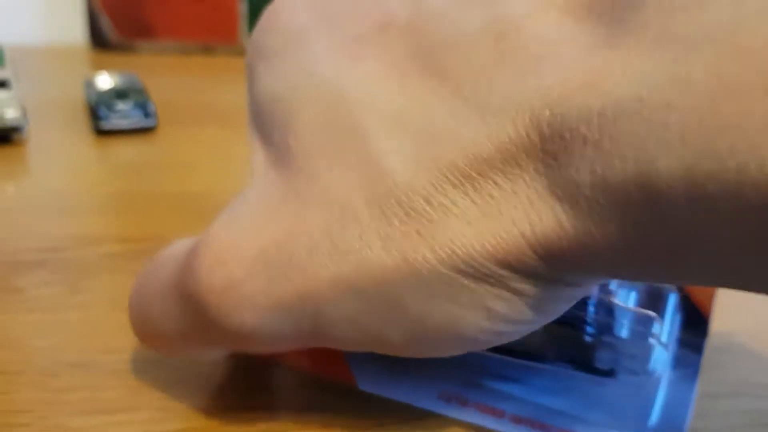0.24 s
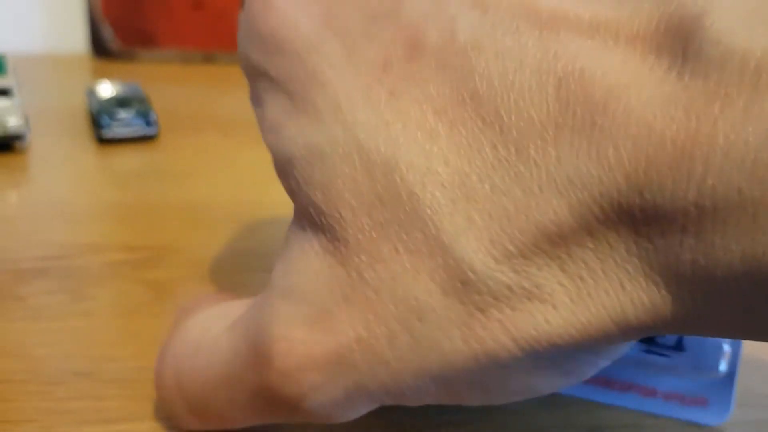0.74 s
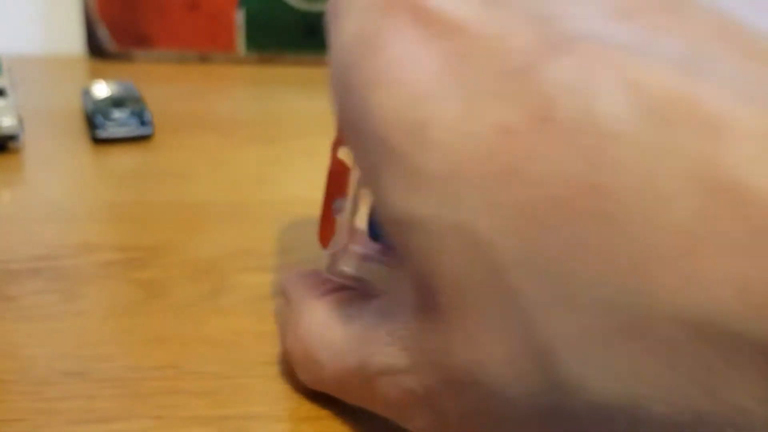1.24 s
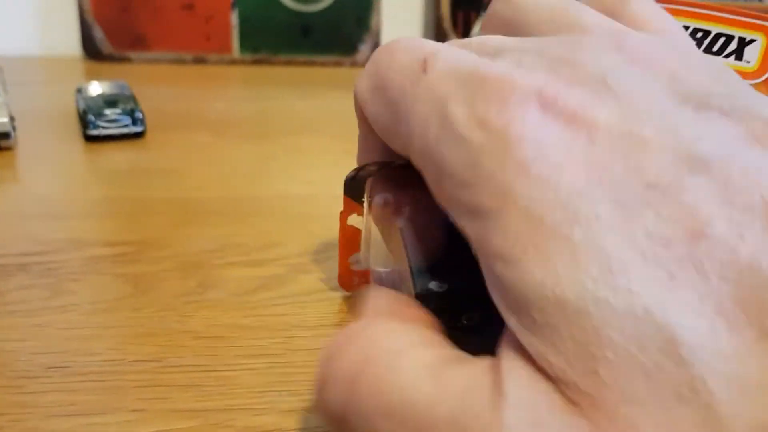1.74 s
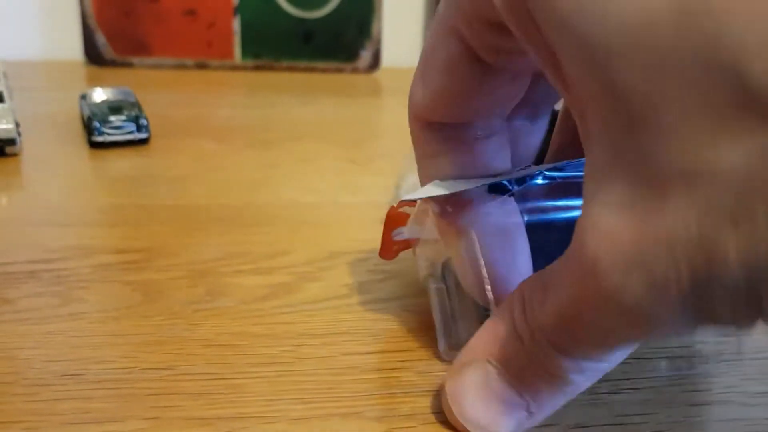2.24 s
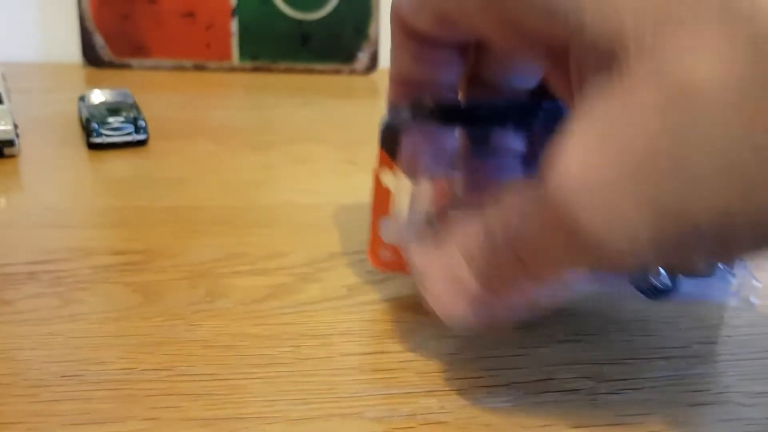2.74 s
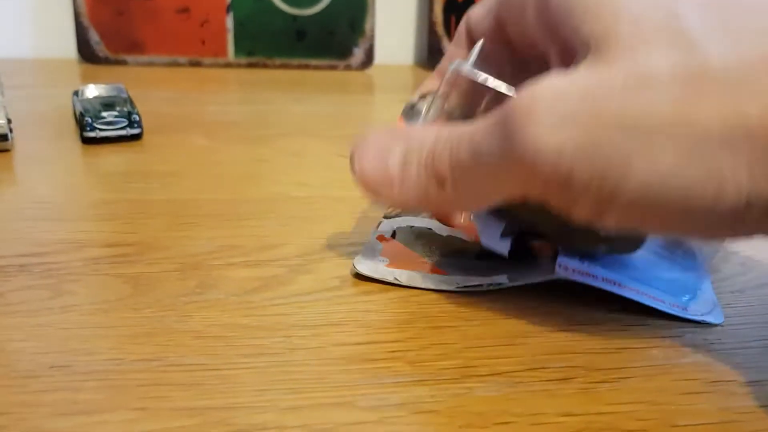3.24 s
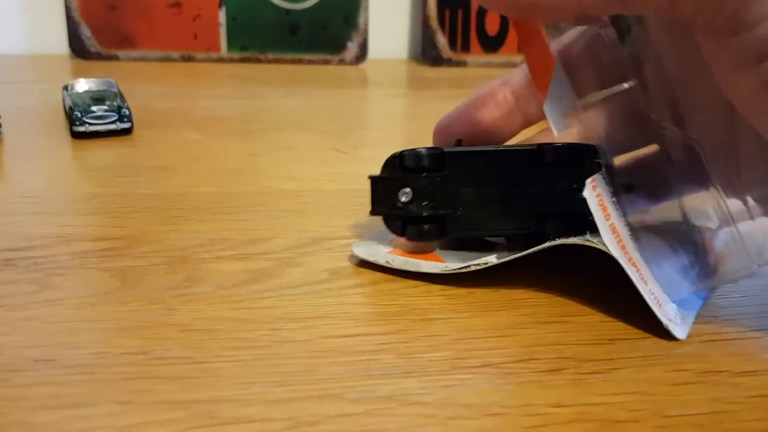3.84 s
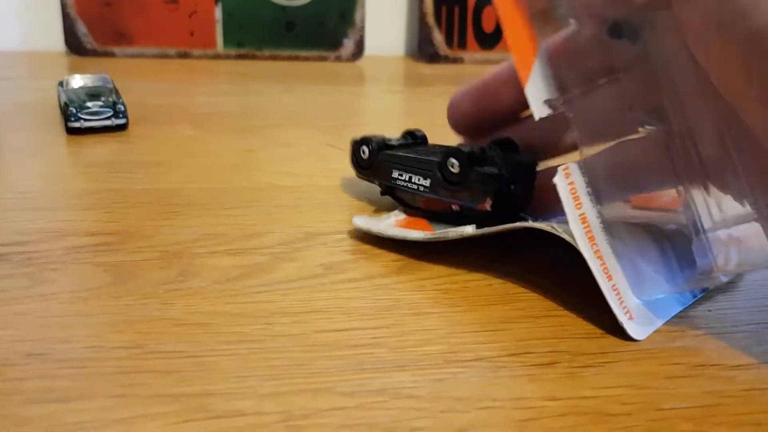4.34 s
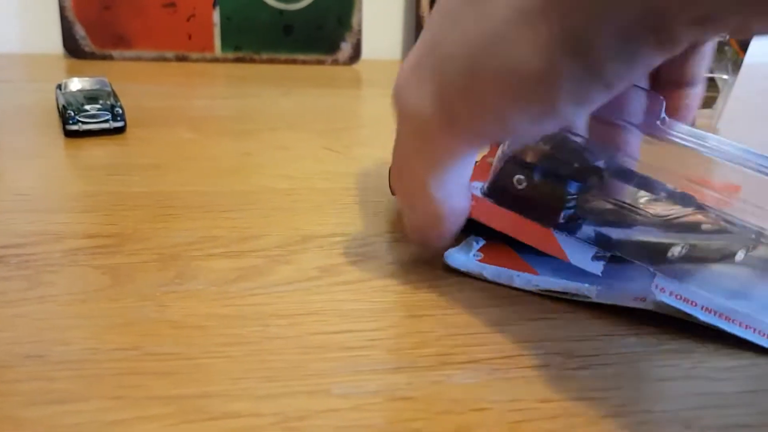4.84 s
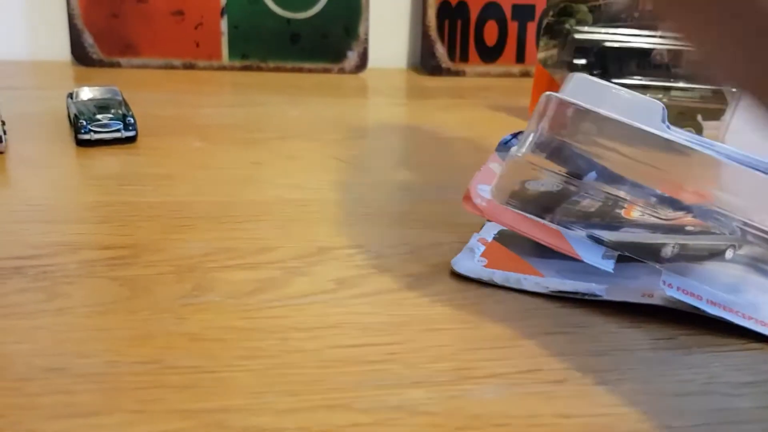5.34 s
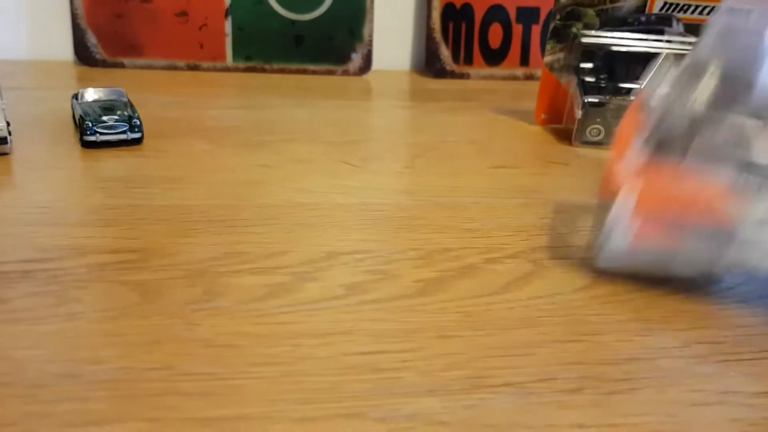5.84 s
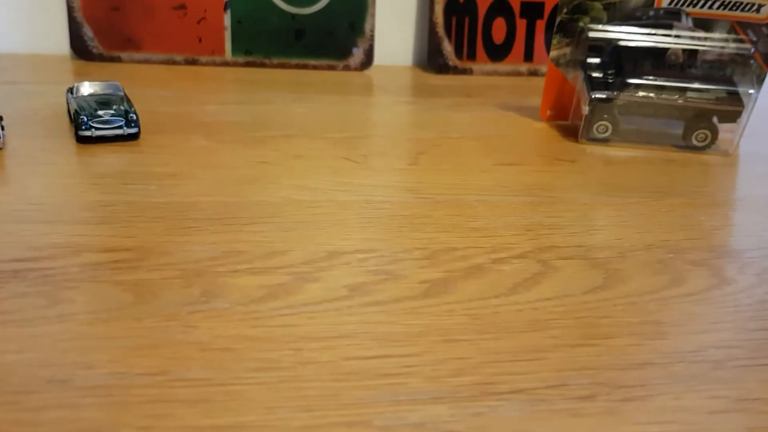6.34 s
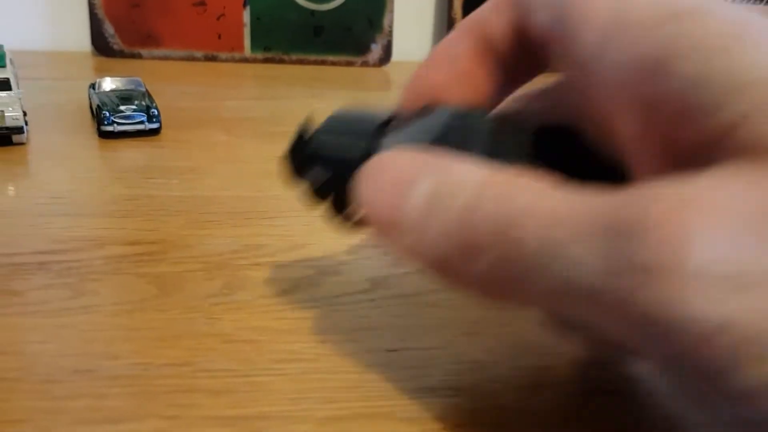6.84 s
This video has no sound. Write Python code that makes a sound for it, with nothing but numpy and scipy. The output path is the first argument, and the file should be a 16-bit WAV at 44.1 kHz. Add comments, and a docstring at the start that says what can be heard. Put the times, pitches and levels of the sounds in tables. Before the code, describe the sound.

In a small, lightly echoing room, a phone close to a wooden table picks up a plastic squeak and soft rustle at once. At about 0.35-0.5 s the clear shell buckles in loud, bright snaps with a short dense rip of glued cardboard; another hard snap and rip comes at 1.0 s. From 1.2 to 3.1 s there is quieter crinkling, fibre crackle, scattered pops and tiny squeaks, with stronger snaps near 1.7, 2.5 and 2.86 s. Around 3.2-3.4 s squeaks and tearing lead to a solid toy-car thud with rattle. Light tearing and a snap at 3.8 s follow, then rattling knocks at 4.25-4.55 s and a snap at 4.94 s. Faint plastic sliding comes near 5.4 s. The hollow empty pack clatters further off at 5.65 s and again at 6.25-6.45 s, then near quiet over low hum, with barely audible scuffs.

```python
"""A squeak and a soft rustle come first: a clear plastic blister is being peeled off its backing card.
The shell snaps as its panels buckle and ring, and the glued seam crackles and rips as fibres break.
Bursts of ringing modes make a toy car knock on card and table, with a rattle from its wheels and base.
The empty pack clatters down further off, with more room echo, and ticking friction makes it slide.
Decaying noise makes the small room's echoes; a quiet low noise is its hum, all heard through a phone."""
import sys
import numpy as np
from scipy import signal
from scipy.fft import rfft, irfft, next_fast_len
from scipy.io import wavfile
from scipy.ndimage import uniform_filter1d

SR = 44100
rng = np.random.default_rng(int(sys.argv[2]) if len(sys.argv) > 2 else 0)


def inscribe(sig):
    """Save sig as 16-bit PCM at rate SR to the path in sys.argv[1].

    A 1-D sig is mono; a 2-D sig holds one channel per row.
    Samples are clipped to [-1, 1] before scaling.
    """
    pcm = np.round(np.clip(np.atleast_2d(sig).T, -1, 1) * 32767)
    wavfile.write(sys.argv[1], SR, pcm.astype(np.int16))


N = 312624
T = np.arange(N) / SR  # time [s]
HIT = T[:SR // 4]  # time within one short hit [s]
LEAD_S = 0.005  # a hit starts this long before its sharp push [s]
TOP_HZ = 16300  # highest pitch the phone passes [Hz]


def amp(db):
    """Turn decibels into a gain."""
    return 10 ** (np.asarray(db) / 20)


def unit(x):
    """Scale so that the channels have a total energy of 1 each on average."""
    return x / np.sqrt(np.mean(np.sum(x ** 2, axis=-1)))


def sized(x, db):
    """Give a hit the same energy as 10 ms of sound at this level."""
    return unit(x) * amp(db) * np.sqrt(SR / 100)


def at(points, hz):
    """Read a table of points on a log-frequency axis."""
    f, value = np.transpose(points)
    return np.interp(np.log(np.maximum(hz, 1)), np.log(f), value)


def through(x, response):
    """Let each channel set off a response (convolution), keeping the length."""
    return signal.fftconvolve(np.atleast_2d(x), np.atleast_2d(response), axes=-1)[:, :x.shape[-1]]


def colour(x, points, size=2048):
    """Shape the spectrum with a minimum-phase filter of unit energy, which never rings ahead of a hit."""
    levels_db = at(points, np.fft.rfftfreq(size, 1 / SR))
    cepstrum = irfft(np.log(amp(levels_db)))
    # fold the cepstrum so that the filter only looks back in time
    cepstrum[1:size // 2] *= 2
    cepstrum[size // 2 + 1:] = 0
    return through(x, unit(irfft(np.exp(rfft(cepstrum)))))


def pair(count, apart):
    """Noise at two microphones; apart is the weight of what they do not share."""
    common, left, right = rng.standard_normal((3, count))
    return (common + apart * np.array([left, right])) / np.hypot(1, apart)


def panned(x, pan_db):
    """Make left louder than right by pan_db, keeping the average power."""
    gains = amp(np.array([[pan_db], [-pan_db]]) / 2)
    return x * gains / np.sqrt(np.mean(gains ** 2))


def add(out, s, x):
    """Mix a sound in at time s."""
    i = max(int(s * SR), 0)
    out[:, i:i + x.shape[-1]] += x[:, :N - i]


def ring(hz, t60):
    """One decaying mode: a tone that falls by 60 dB in t60 seconds."""
    return np.sin(2 * np.pi * hz * HIT) * np.exp(-np.log(1000) * HIT / t60)


def contact(fade_s, scatter, apart, creep=0.15, grain_db=0):
    """A brief creep, one sharp push at LEAD_S, then a dying scatter of slips that come in 1 ms clumps."""
    t = HIT - LEAD_S
    clump_sizes = amp(grain_db * np.clip(rng.standard_normal(len(HIT)), -2, 2))
    clumps = clump_sizes[(HIT * 1000).astype(int)]
    before = creep * np.exp(-np.abs(t) / 0.002)
    after = np.exp(-np.abs(t) / fade_s)
    slips = np.where(t < 0, before, after)
    push = scatter * unit(pair(len(HIT), apart) * slips * clumps)
    push[:, int(LEAD_S * SR)] += 1
    return push


def crackle(rate, spread_db, apart):
    """Fibres breaking at random, rate per second: many faint, a few strong; rms 1."""
    strength = np.minimum(rng.exponential(size=N), 4)
    breaks = rng.random(N) < rate / SR
    sizes = amp(spread_db * strength) * breaks
    return unit(sizes * np.clip(pair(N, apart), -2, 2)) * np.sqrt(N)


def flutter(rate, depth_db):
    """Uneven grip: a gain that wanders to a new random value rate times a second."""
    k = int(SR / rate)
    steps = np.repeat(rng.standard_normal(N // k + 1), k)
    return amp(depth_db * uniform_filter1d(steps, k)[:N])


def flexing(x, depth_db, width_hz, hold_s, size=512):
    """As the sheet bends its resonances come and go, so every crinkle has its own colour."""
    _, _, frames = signal.stft(x, nperseg=size)
    field = rng.standard_normal(frames.shape[1:])
    # blur the random gains over pitch, then over time
    for axis, span in enumerate([width_hz * size / SR, hold_s * SR / (size / 2)]):
        blur = np.exp(-(np.arange(-20, 21) / span) ** 2)
        field = signal.fftconvolve(field, np.expand_dims(blur, 1 - axis), "same")
    gain = amp(depth_db * np.clip(field / field.std(), -2, 2))
    gain = gain / np.sqrt(np.mean(gain ** 2))
    return signal.istft(frames * gain, nperseg=size)[1][:, :N]


# The shell buckles: (time [s], level [dB], panel pitch [Hz], crack relative to level [dB])
BUCKLES = [(0.242, -40, 780, -3.5), (0.361, -19, 1120, 2.5), (0.3853, -24.5, 1280, 3.5),
           (0.4945, -22.5, 1030, -23), (0.6429, -40.5, 730, -12), (0.719, -46.5, 1130, -7),
           (0.8257, -39, 814, -14.5), (0.9939, -14.5, 1010, -14.5), (1.021, -25, 1120, -4.5),
           (1.1011, -29.5, 1130, -7), (1.112, -36, 1330, -11), (1.6855, -30, 1074, -8.5),
           (1.739, -43.5, 1060, 0.5), (1.853, -43.5, 1170, -10), (1.9129, -42.5, 870, -4),
           (1.9399, -38, 1130, -4.5), (2.1855, -35.5, 1190, -8.5), (2.4257, -41.5, 1140, -21),
           (2.5017, -29.5, 1135, -13), (2.5717, -28, 1080, -16.5), (2.6247, -41.5, 1170, -14),
           (2.8632, -23.5, 1314, -0.5), (3.023, -40.5, 1260, -23), (3.077, -33.5, 880, -7.5),
           (3.2997, -42, 1110, 8), (3.7692, -44, 1300, 8), (3.8126, -24, 970, -8),
           (4.226, -50.5, 1140, 3.5), (4.7971, -43, 1200, 3.5), (4.9401, -29, 1247, -4.5)]
# Ringing of the backing card: (frequency [Hz], level [dB], 60 dB decay time [s])
CARD_RINGING = [(208, -5, 0.0073), (278, 0.5, 0.068), (503, 9, 0.013)]
# Soft buckles lean on the card, hard ones spring free: (level [dB], thump relative to level [dB])
CARD_THUMP = [(-40, -12.5), (-18.5, -18.5)]
# The pack moves from the left to the middle: (time [s], left minus right [dB])
PACK_PLACE = [(0.4, 5), (1.7, 4), (3.0, 3), (3.8, 1.9), (4.9, -1)]
# Tone of the ringing shell: (frequency [Hz], level per Hz [dB])
SHELL_TONE = [(150, -25), (400, -8.5), (700, -3), (1100, 6.5), (1850, 4), (2300, 1), (3200, -17),
              (6000, -38)]
# How card and table give off sound: (frequency [Hz], level per Hz [dB])
BOARD_TONE = [(40, -31.5), (100, -13.5), (180, 0), (700, 2.5), (1300, -9), (4000, -32.5)]
# Tone of a bright crack: (frequency [Hz], level per Hz [dB])
CRACK_TONE = [(1200, -44.5), (2300, -1), (3000, 0.5), (3700, 1.5), (4300, 1), (4900, 2), (5700, -21.5),
              (9000, -30)]
# Tone of the fizz, higher still: (frequency [Hz], level per Hz [dB])
FIZZ_TONE = [(3500, -24), (5400, -6), (7200, 3), (8800, -4.5), (11000, 3), (13000, -2.5), (16000, -7)]
WALL_HZ, WALL_SPREAD = 1609, 0.11  # shell wall pitch [Hz], its spread as the grip changes [share]
FIZZ_DB, FIZZ_PAN_DB = -8, 3.5  # fizz relative to crack [dB], fizz left minus right [dB]
TREBLE_SHADE = 1.7  # the crack is shaded more on its way to the far microphone [times the shell's pan]


def snaps():
    """Each buckle rings its panel and the hand-damped wall, thumps the card and sheds a bright crack."""
    out = np.zeros((2, N))
    card = sum(amp(mode_db) * ring(hz, t60) for hz, mode_db, t60 in CARD_RINGING)
    for s, db, panel_hz, crack_db in BUCKLES:
        wall_hz = WALL_HZ * (1 + WALL_SPREAD * rng.standard_normal())
        modes = ring(panel_hz, 0.015) + 1.2 * ring(0.66 * panel_hz, 0.014)
        modes += 1.1 * ring(wall_hz, 0.02) + 0.45 * ring(1.25 * wall_hz, 0.012)
        modes[0] += 12.0  # the broad flex of the whole wall
        creep = np.interp(db, [-38, -22], [0.6, 0.1])  # soft buckles ease in, hard ones go at once

        shell = colour(through(contact(0.014, 0.34, 0.15, creep), modes), SHELL_TONE)
        thump = colour(through(contact(0.0022, 1.0, 0.36), card), BOARD_TONE)
        crack = colour(contact(0.0035, 1.4, 1.0, creep), CRACK_TONE)
        fizz = colour(contact(0.0029, 1.3, 2.3), FIZZ_TONE)

        pan_db = np.interp(s, *np.transpose(PACK_PLACE))
        thump_db = db + np.interp(db, *np.transpose(CARD_THUMP))
        snap = sized(thump, thump_db) + panned(sized(shell, db), pan_db)
        snap += panned(sized(crack, db + crack_db), TREBLE_SHADE * pan_db)
        snap += panned(sized(fizz, db + crack_db + FIZZ_DB), FIZZ_PAN_DB)
        add(out, s - LEAD_S, snap)
    return out


# Hand tugs: (peak time [s], length [s], rustle level [dB], tearing fibres relative to rustle [dB])
HAND_TUGS = [(0.03, 0.12, -40.5, -3), (0.248, 0.083, -47, 2.5), (0.6, 0.078, -49, -2.5),
             (0.834, 0.11, -48, -3), (0.99, 0.025, -36, 2), (1.1, .09, -47.5, -7), (1.287, 0.3, -52.5, -9),
             (1.59, 0.044, -53, -10), (1.751, 0.061, -49, -2.5), (1.826, 0.052, -47.5, -9.5),
             (1.92, .022, -41.5, -7.5), (1.948, 0.082, -51.5, 0), (2.187, 0.025, -46.5, -9),
             (2.309, 0.029, -43, -11), (2.503, 0.046, -43.5, -5.5), (2.622, 0.073, -44, -5.5),
             (2.765, 0.077, -42, -5.5), (3.035, 0.27, -47, -8), (3.224, 0.087, -44, 1),
             (3.306, 0.021, -43.5, 6), (3.358, 0.19, -48, 11.5), (3.736, 0.19, -49, 5.5),
             (3.94, 0.15, -56.5, 3.5), (4.145, 0.089, -52, -2.5), (4.333, 0.24, -49.5, -0.5),
             (4.545, 0.12, -49.5, -3), (4.806, 0.024, -43.5, -4.5), (4.877, 0.095, -45.5, -1.5)]
# Faint rustle of the held pack between tugs: (time [s], level [dB])
HELD_RUSTLE = [(0, -56), (1.05, -57.5), (1.5, -66.5), (2.08, -56), (2.45, -62.5), (2.9, -57.5),
               (3.6, -55.5), (4.5, -64), (4.7, -73.5), (4.98, -57), (5.12, -92.5)]
# Tone of the rustling shell: (frequency [Hz], level per Hz [dB])
RUSTLE_TONE = [(80, -23), (220, -8.5), (420, -8), (700, -0.5), (900, -3.5), (1110, 5), (1350, -3.5),
               (1660, 4), (2100, -5), (2700, -13), (5000, -33.5)]
# Tone of the tearing fibres: (frequency [Hz], level per Hz [dB])
FIBRE_TONE = [(1200, -15), (2400, 0.5), (3400, -0.5), (4400, 2), (5600, -6.5), (7200, -5), (9000, -10),
              (11400, -3.5), (13000, -8), (16000, -16.5)]
GRIP_FIBRES_DB = -4.5  # fibres parting under the steady grip, relative to its rustle [dB]
TUG_RISE = 0.38  # share of a tug spent building up; the rest is its release


def peeling():
    """Grip and tugs set the shell rustling while card fibres part along the glue line."""
    shell_power = amp(np.interp(T, *np.transpose(HELD_RUSTLE))) ** 2
    fibre_power = shell_power * amp(GRIP_FIBRES_DB) ** 2
    for s, length_s, db, tearing_db in HAND_TUGS:
        power = tug(s, length_s) * amp(db) ** 2
        shell_power = shell_power + power
        fibre_power = fibre_power + power * amp(tearing_db) ** 2
    shell = colour(crackle(rate=1400, spread_db=1.5, apart=0.93), RUSTLE_TONE) * np.sqrt(shell_power)
    fibres = colour(crackle(rate=4100, spread_db=1, apart=8.2), FIBRE_TONE) * np.sqrt(fibre_power)
    pull = panned(shell, pan_db=2) + panned(fibres, pan_db=5.0)
    pull = pull * flutter(rate=120, depth_db=2.5) * amp(0.18)  # the small lift applies to all peeling
    return flexing(pull, depth_db=2.5, width_hz=250, hold_s=0.014)


def tug(s, length_s):
    """The power of one tug: a quick build-up to its peak at s, then a slower release."""
    side_s = length_s * np.where(T < s, TUG_RISE, 1 - TUG_RISE)
    progress = (T - s) / side_s
    return np.exp(-2 * np.minimum(progress ** 2, 20))


# A stretch of seam lets go at once: (time [s], level [dB], time to fade to 1/e [s])
SEAM_RIPS = [(0.368, -15.5, .032), (0.998, -26, .03), (3.401, -35, 0.029)]
# Tone of the ripping seam: (frequency [Hz], level per Hz [dB])
SEAM_TONE = [(150, -24), (400, -15.5), (700, -3.5), (1200, -4.5), (2000, 5), (2800, -5.5), (4200, -3.5),
             (5600, -14.5), (8500, -19.5), (11500, -17), (16000, -29)]


def rips():
    """A run of the seam gives way in a dense, fading burst."""
    force = np.zeros((1, N))
    for s, db, fade_s in SEAM_RIPS:
        add(force, s, amp(db) * np.exp(-HIT[None] / fade_s))
    breaks = crackle(rate=5400, spread_db=1, apart=3.1)
    return panned(colour(breaks * force, SEAM_TONE), pan_db=3)


# A single strand of the card pops: (time [s], level [dB])
STRAND_POPS = [(0.1055, -46.5), (0.117, -49), (0.2112, -44.5), (0.2323, -35.5), (3.1935, -41), (3.335, -37),
               (3.4666, -40.5), (3.652, -51.5), (3.7288, -46), (3.893, -54), (3.911, -46), (4.045, -53)]


def pops():
    """A breaking strand is all treble: too light to ring the shell."""
    out = np.zeros((2, N))
    for s, db in STRAND_POPS:
        push = contact(0.003, 3, 1.2)
        pop = sized(colour(push, FIZZ_TONE), db) + sized(colour(push, CRACK_TONE), db - 7)
        add(out, s - LEAD_S, panned(pop, pan_db=10.5))
    return out


# Plastic sticks and slips: (centre time [s], half length [s], central pitch [Hz], level [dB])
PLASTIC_SQUEAKS = [(0.035, 0.015, 1720, -34.5), (0.08, 0.0063, 1750, -33), (1.765, 0.023, 3540, -46.5),
                   (1.971, 0.0043, 1020, -32.5), (2.76, .012, 1100, -35.5), (3.199, .004, 1156, -30),
                   (3.215, 0.0065, 1214, -32), (3.315, .02, 1195, -35.5), (4.895, .011, 1300, -34.5),
                   (5.368, .005, 4350, -42.5), (5.428, 0.007, 1790, -52), (6.98, 0.014, 1635, -67)]


def squeaks():
    """Short runs of uneven stick-slip cycles, nearly a tone."""
    out = np.zeros((2, N))
    waver, grip = flutter(rate=720, depth_db=0.74), flutter(rate=450, depth_db=5.5)
    for s, half_s, hz, db in PLASTIC_SQUEAKS:
        now = np.abs(T - s) < 4 * half_s
        wavering_hz = hz + 1200 * (waver[now] - 1)
        phase = 2 * np.pi * np.cumsum(wavering_hz) / SR
        slips = np.sin(phase) + 0.18 * np.sin(2 * phase)
        swell = np.exp(-((T[now] - s) / half_s) ** 2)
        out[:, now] += panned(slips * swell * grip[now] * amp(db), pan_db=5.0)
    return out


# The car knocks on card and table: (time [s], level [dB], rattle relative to level [dB])
CAR_KNOCKS = [(0.2956, -41, -28), (1.021, -30.5, -19), (3.3598, -16, -11), (3.3978, -29.5, -15),
              (4.2476, -33.5, -3.5), (4.2624, -32.5, -14), (4.275, -30.5, 1), (4.3118, -39.5, 0.5),
              (4.333, -49.5, 3), (4.3832, -24.5, -2.5), (4.3975, -25.5, -6), (4.5374, -36, 0),
              (5.9681, -55, -16)]
# Ringing under the car: (frequency [Hz], level [dB], 60 dB decay time [s])
TABLE_RINGING = [(221, -5, .13), (242.4, -4, 0.17), (302, -6.5, 0.29), (388, -10.5, .14),
                 (464, -4.5, 0.078), (523, -4.5, 0.047), (596, -2, 0.096), (652, -13.5, 0.19),
                 (876, 0, 0.055)]
# Tone of the car's rattle: (frequency [Hz], level per Hz [dB])
RATTLE_TONE = [(500, -12.5), (1100, 2.5), (1400, -1.5), (1650, 5), (2100, -4), (3050, 0.5), (4500, -5.5),
               (6000, -16), (11000, -19), (16000, -26.5)]


def knocks():
    """The car drops against card and table; its wheels and base rattle with each blow."""
    out = np.zeros((2, N))
    for s, db, rattle_db in CAR_KNOCKS:
        wood = sum(amp(mode_db) * rng.choice([-1, 1]) * ring(hz, t60) for hz, mode_db, t60 in TABLE_RINGING)
        boom = sized(colour(through(contact(0.0052, 0.25, 0.6), wood), BOARD_TONE), db - 5.5)
        thud = sized(colour(contact(0.011, 0.84, 0.6), BOARD_TONE), db - 5.5)
        rattle = sized(colour(contact(0.015, 2.9, 0.46, grain_db=2.5), RATTLE_TONE), db + rattle_db)
        add(out, s - LEAD_S, panned(boom + thud, pan_db=-1.5) + panned(rattle, pan_db=5.5))
    return out


# The loose shell slides: (centre time [s], half length [s], relative level [dB])
SHELL_SLIDES = [(5.303, 0.0028, -59), (5.372, 0.044, -50), (5.377, 0.0023, -43), (5.427, 0.017, -46.5),
                (6.552, 0.0067, -47.5), (6.635, 0.009, -57), (6.711, 0.034, -57.5), (6.964, 0.029, -66)]
# Ringing of the loose shell: (frequency [Hz], level [dB], 60 dB decay time [s])
LOOSE_SHELL_RINGING = [(1736, -10.5, 0.02), (2566, -1, 0.019), (3190, 2.5, 0.0055), (4250, 6, 0.0054),
                       (6200, -2, 0.0052)]


def slides():
    """Fine friction ticks ring the modes of the empty shell."""
    pressure = 0
    for s, half_s, db in SHELL_SLIDES:
        pressure = pressure + amp(db) * np.exp(-np.minimum(((T - s) / half_s) ** 2, 20))
    modes = 0
    for k, (hz, db, t60) in enumerate(LOOSE_SHELL_RINGING):
        # dividing by the root of the decay time evens out the energy of long and short modes
        modes = modes + (-1) ** k * amp(db) * ring(hz, t60) / np.sqrt(t60)
    ticks = pressure * crackle(rate=2000, spread_db=2, apart=1)
    slide = through(ticks, unit(modes)) + amp(-8.5) * colour(ticks, FIZZ_TONE)
    return flexing(panned(slide, pan_db=4.5), depth_db=3.5, width_hz=260, hold_s=0.013)


# The pack lands and settles; levels are relative, as scene() sets the distant sound's loudness:
# (time [s], level [dB], edge tick relative to level [dB], clatter time to fade to 1/e [s])
PACK_DROPS = [(5.636, -46.5, -19, 0.028), (5.6562, -40, -22, 0.014), (5.669, -36, -10, 0.0037),
              (6.258, -36, 0, 0.02), (6.2679, -30, -20, 0.027), (6.363, -37, -16, 0.015),
              (6.422, -38.5, -14, 0.014), (6.441, -42, -32, 0.043)]
# Tone of the empty pack: (frequency [Hz], level per Hz [dB])
PACK_TONE = [(40, -10.5), (130, -5), (260, -3), (550, -5), (850, 3.5), (1500, 4.5), (2200, -3), (4300, -9),
             (6000, -12.5), (11000, -20.5), (16000, -30)]
# Tone of the pack's hard edge: (frequency [Hz], level per Hz [dB])
EDGE_TONE = [(2500, -2), (5000, -5), (8500, -5.5), (11000, 14), (13000, 1), (16000, 2)]
# Hollow boom: pitch [Hz], 60 dB decay time [s], level relative to the landing [dB]
PACK_BOOM_HZ, PACK_BOOM_T60_S, PACK_BOOM_DB = 903, 0.082, -12.5


def drops():
    """The light, hollow pack clatters down and rings briefly; its hard edge adds a tick."""
    out = np.zeros((2, N))
    for s, db, tick_db, clatter_s in PACK_DROPS:
        push = contact(clatter_s, 4.04, 1.3, grain_db=3.0)
        clatter = sized(colour(push, PACK_TONE), db)
        boom = sized(through(push, ring(PACK_BOOM_HZ, PACK_BOOM_T60_S)), db + PACK_BOOM_DB)
        tick = sized(colour(contact(0.0011, 3.9, 1.7), EDGE_TONE), db + tick_db)
        add(out, s - LEAD_S, panned(clatter + boom, pan_db=3.0) + panned(tick, pan_db=8))
    return out


def dispersed(x, delay_s):
    """Bending waves run faster the higher they are, so each click becomes a tiny chirp."""
    size = next_fast_len(N + SR)
    hz = np.fft.rfftfreq(size, 1 / SR)
    # the delay is delay_s * (sqrt(1000 / hz) - 1/2): half of delay_s at 1 kHz, none at 4 kHz
    turns = delay_s * (2 * np.sqrt(1000 * hz) - hz / 2)
    return irfft(rfft(x, size) * np.exp(-2j * np.pi * turns), size)[:, :N]


def left_late(x, count):
    """Sound from the right reaches the left microphone a few samples later."""
    return np.array([np.roll(x[0], count), x[1]])


# How fast the room's echoes die: (frequency [Hz], 60 dB decay time [s])
ROOM_DECAY = [(150, 0.37), (500, 0.34), (1200, 0.25), (3500, 0.32), (8000, 0.18), (16000, 0.33)]


def room(count=10):
    """Diffuse reflections that build up over a few milliseconds, each band with its own decay."""
    t = T[:SR]
    hz = np.fft.rfftfreq(SR, 1 / SR)
    centres = np.geomspace(100, TOP_HZ, count)
    noise = rfft(pair(SR, 1.1))
    tail = 0
    for centre_hz, share in zip(centres, np.eye(count)):
        band = irfft(noise * at(list(zip(centres, share)), hz))
        tail = tail + band * np.exp(-np.log(1000) * t / at(ROOM_DECAY, centre_hz))
    build_up = np.clip((t - 0.004) / 0.0055, 0, 1)
    return unit(tail * build_up)


# Tone of the room's hum: (frequency [Hz], level per Hz [dB])
HUM_TONE = [(25, -18.5), (65, -3.5), (100, -7), (140, 1), (190, -16), (260, -19.5), (500, -27.5),
            (1200, -33.5), (1650, -28.5), (2200, -32.5), (3200, -32.5), (6500, -38), (11300, -32),
            (16000, -38)]


def hum():
    """Steady noise, strongest in the bass, makes the quiet hum of the room."""
    return panned(colour(pair(N, 0.69), HUM_TONE, size=8192), pan_db=-2.5) * amp(-65.5)


def scene():
    """Close handling, the distant pack, their reflections and the quiet hum of the room."""
    handling = snaps() + pops() + peeling() + rips() + squeaks() + slides() + knocks()
    near = left_late(dispersed(handling, delay_s=0.0008), count=5)
    far = left_late(drops(), count=14)
    into_room = amp(-11.5) * near.mean(axis=0) + amp(-1.5) * far.mean(axis=0)
    return near + amp(4.0) * far + through(into_room, room()) + hum()


def record(dry):
    """The phone thins the deep bass, clips at full scale and cuts the top."""
    bass_cut = signal.butter(2, 44.6, "high", fs=SR, output="sos")
    top_cut = signal.ellip(10, 0.2, 80, TOP_HZ, fs=SR, output="sos")
    thinned = signal.sosfilt(bass_cut, dry)
    return signal.sosfilt(top_cut, np.clip(thinned, -1, 1))


dry = scene()
out = record(dry)
inscribe(out)
```